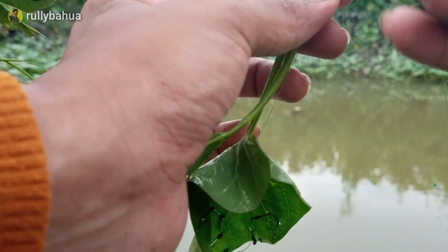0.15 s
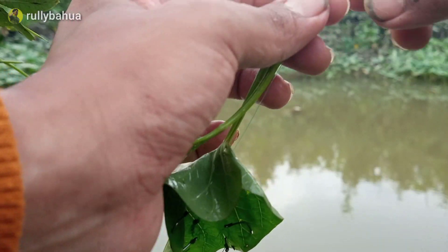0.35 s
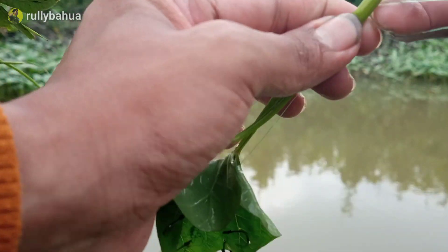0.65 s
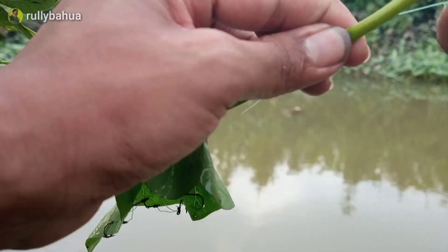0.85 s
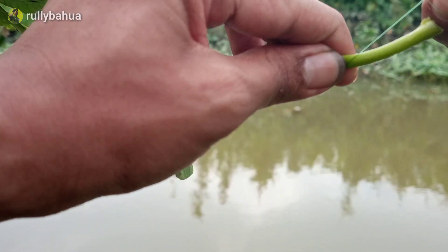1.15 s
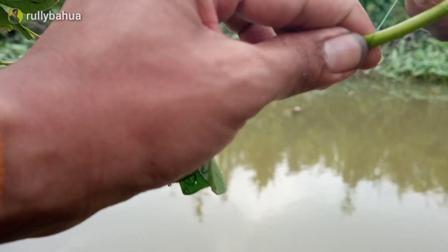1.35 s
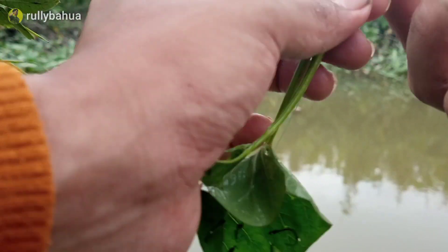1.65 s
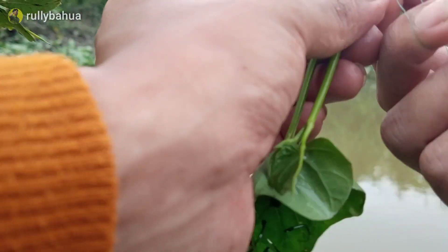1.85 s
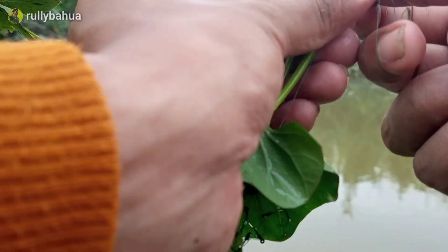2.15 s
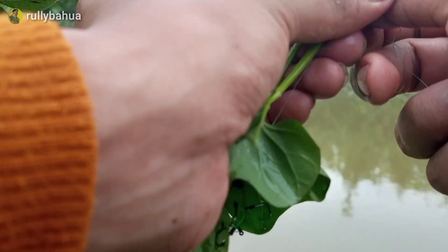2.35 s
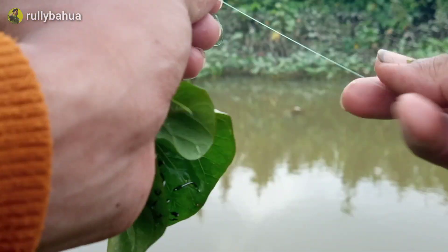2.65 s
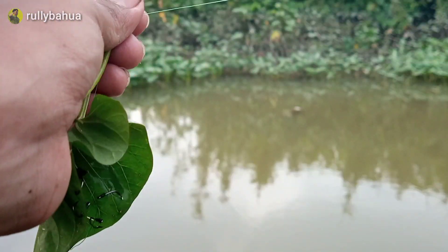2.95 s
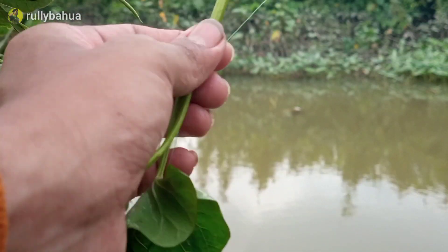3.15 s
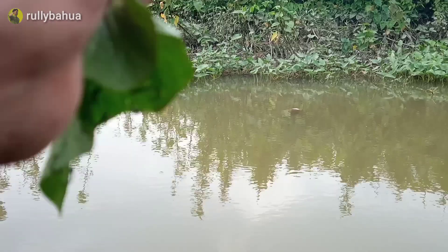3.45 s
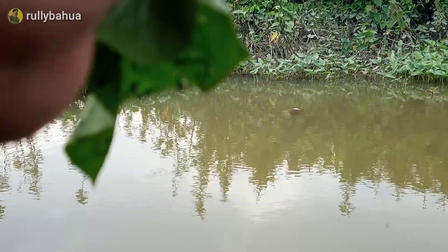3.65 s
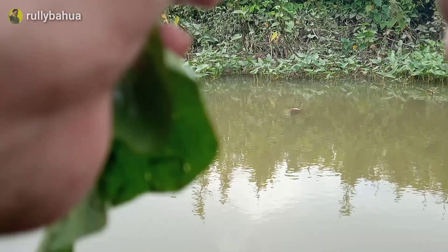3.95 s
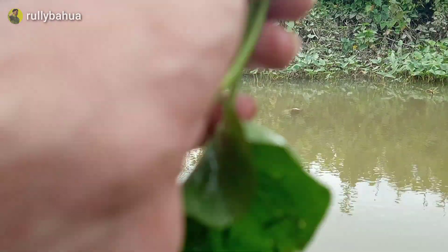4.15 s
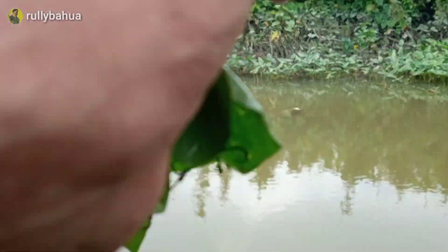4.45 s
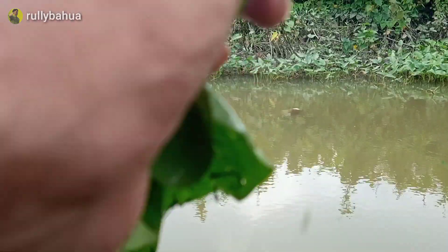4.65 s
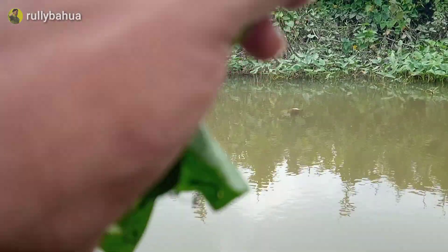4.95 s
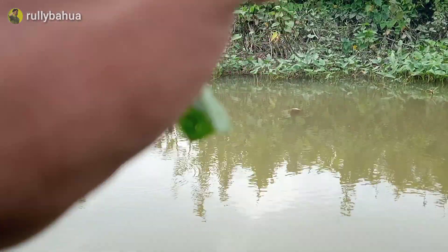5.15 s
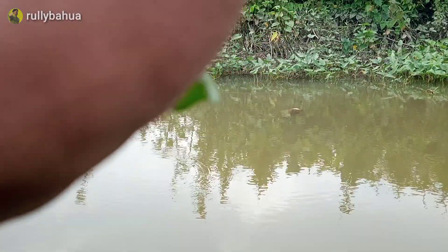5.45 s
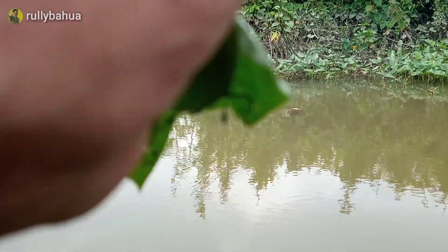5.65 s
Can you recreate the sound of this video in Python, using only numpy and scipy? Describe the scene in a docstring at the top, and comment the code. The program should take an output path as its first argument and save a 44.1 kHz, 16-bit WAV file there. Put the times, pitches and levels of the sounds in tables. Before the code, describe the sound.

Crickets drone by a pond over a distant throbbing engine, with a few bird chirps, light clicks and soft handling bumps.

```python
"""Crickets drone all round a pond, scraping their wings into high trills, buzzes and rasps.
A distant engine throbs and slowly loses speed, its exhaust tones beating over a rumble.
A small bird gives two rising whistles, a run of chips and a twitter; another answers lower,
and faint calls cross the water. Close by, hands work a fishing line and a plant stem:
light clicks, and soft bumps on the microphone."""
import sys
import numpy as np
from scipy import signal
from scipy.fft import rfft, irfft, next_fast_len
from scipy.io import wavfile
from scipy.ndimage import uniform_filter1d

SR = 44100
rng = np.random.default_rng(int(sys.argv[2]) if len(sys.argv) > 2 else 0)


def output_pcm(signal):
    """Save a mono or channel-first signal as 16-bit PCM at the path in sys.argv[1].

    Samples are clipped to [-1, 1] before scaling.
    """
    pcm = np.clip(np.atleast_2d(signal).T, -1, 1) * 32767
    wavfile.write(sys.argv[1], SR, np.round(pcm).astype(np.int16))


N = 255766
T = np.arange(N) / SR


def undb(db):
    """Decibels to gain."""
    return 10 ** (np.asarray(db) / 20)


def unit(x):
    """Scale to rms 1."""
    return x / np.sqrt(np.mean(x ** 2))


def faders(table):
    """One fader ride for each column after the times."""
    times, *columns = np.transpose(table)
    return [np.interp(T, times, column) for column in columns]


def eq_curve(points, size):
    """Gain of (Hz, dB) EQ points on the bins of a transform."""
    hz, db = np.transpose(points)
    bins = np.maximum(np.fft.rfftfreq(size, 1 / SR), 1)
    return undb(np.interp(np.log(bins), np.log(hz), db, left=-90, right=-90))


def noise(eq):
    """Noise through an EQ, rms 1."""
    size = next_fast_len(N)
    return unit(irfft(rfft(rng.standard_normal(size)) * eq_curve(eq, size), size)[:N])


def wander(rate_hz):
    """Smooth random modulation, rms 1."""
    hold = max(int(SR / rate_hz), 1)
    steps = np.repeat(rng.standard_normal(N // hold + 1), hold)
    return unit(uniform_filter1d(steps, hold)[:N])


def soft_gate(middle_s, half_s):
    """A rounded gate that opens and closes about a moment."""
    return np.exp(-((T - middle_s) / half_s) ** 4)


def add(out, start_s, sound):
    """Mix a sound in at a time."""
    i = max(int(start_s * SR), 0)
    out[i:i + len(sound)] += sound[:max(N - i, 0)]


def bank_echo(dry, wet_db, t60, dull_hz=9000):
    """Leaves and the far bank add a short, duller diffuse echo."""
    t = np.arange(SR // 2) / SR
    tail = rng.standard_normal(len(t)) * undb(-60 * t / t60) * (t > .002)
    tail = signal.sosfilt(signal.butter(1, dull_hz, fs=SR, output="sos"), tail / np.linalg.norm(tail))
    return dry + undb(wet_db) * signal.fftconvolve(dry, tail)[:N]


# Tone of the open air. Each row: frequency in Hz, gain in dB.
AIR_EQ = [(25, -3), (100, 4), (400, 1), (500, -0.5), (590, 1.5), (720, -3.5), (1000, -5), (1900, -9),
          (3500, -12.5), (5500, -14), (11000, -13), (13000, -27.5), (15300, -12.5)]
def air():
    """A quiet, wavering bed of hiss."""
    return noise(AIR_EQ) * undb(-60 + 1.2 * wander(12))


# Exhaust partials. Each row: multiple of the cycle rate, opening gain in dB, closing gain in dB.
EXHAUST_PARTIALS = [(4, -9.5, -6), (5, 4, 0), (6, -7.5, 0.5), (7, -49, -31), (8, -42, -11.5),
                    (11, -54, -24.5)]
# Fader for the exhaust note. Each row: time in seconds, relative level in dB.
EXHAUST_FADER = [(0.0, -36.5), (0.15, -33.5), (0.45, -36), (0.6, -32.5), (0.75, -35.0), (1.05, -35),
                 (1.33, -39), (1.55, -34.5), (1.8, -38.5), (2.0, -38), (2.3, -35), (2.5, -36.5),
                 (3.3, -37.3), (3.72, -34), (4.24, -38), (4.7, -35), (5.3, -36), (5.8, -36.1)]
# The low rumble and the higher roar. Each row: frequency in Hz, gain in dB.
RUMBLE_EQ = [(25, -34), (45, -14.5), (65, -14.5), (95, -0.5), (125, -6.5), (170, -2), (215, -5),
             (250, -14.5), (310, -29.5), (450, -34.5)]
ROAR_EQ = [(170, -26.5), (220, 1), (260, 0.5), (320, 0), (360, -10.5), (420, -18.5), (520, -39)]
def engine(cycle_hz=30.86, sag_hz_per_s=.607, first_firing_s=.023, chug=.053):
    """Neighbouring multiples of the cycle rate pass the exhaust and beat into a throb over a rumble."""
    hz = (cycle_hz - sag_hz_per_s * T) * (1 + .0017 * wander(12))
    phase = 2 * np.pi * (np.cumsum(hz) / SR - cycle_hz * first_firing_s)
    # all partials peak together at each firing
    note = sum(undb(first + (last - first) * T / T[-1] + 1.6 * wander(14)) * np.cos(multiple * phase)
               for multiple, first, last in EXHAUST_PARTIALS)
    exhaust = unit(note) * undb(faders(EXHAUST_FADER)[0] + .94)
    rumble = noise(RUMBLE_EQ) * undb(-44)
    roar = noise(ROAR_EQ) * (1 + chug * np.cos(phase))
    roar_db = -62 + 14 * soft_gate(middle_s=4.17, half_s=2.08) + 1.9 * wander(12)
    return exhaust + rumble + roar * undb(roar_db)


def bird_notes(notes, waver=.0094, rasp=.014, flutter_db=2):
    """Whistles, each bent through three pitches; fast pitch jitter roughens the short ones most."""
    out, drift, jitter = np.zeros(N), waver * wander(400), rasp * wander(2000)
    for start, length, first_hz, middle_hz, last_hz, db in notes:
        progress = np.linspace(0, 1, int(length * SR))
        span = int(start * SR) + np.arange(len(progress))
        bend = np.polyfit([0, .5, 1], [first_hz, middle_hz, last_hz], 2)
        hz = np.polyval(bend, progress) * (1 + drift[span] + jitter[span] * min(1, .035 / length))
        envelope = undb(db) * np.sin(np.pi * progress)
        add(out, start, envelope * np.sin(2 * np.pi * np.cumsum(hz) / SR))
    return out * undb(flutter_db * wander(120))


# Distant calls. Each row: start in seconds, length in seconds, pitch in Hz,
# glide as last pitch over first, relative level in dB.
FAR_CALLS = [(1.16, 0.079, 1838, 1.03, -58.5), (1.185, .032, 3400, 0.98, -58.5),
             (1.49, .076, 5450, 1.1, -59), (1.505, .061, 3710, .94, -63), (1.83, 0.051, 2550, 1.14, -59.5),
             (2.88, .07, 2220, 1.01, -60), (2.99, 0.066, 2136, 0.89, -58), (3.17, 0.065, 1370, 1.02, -63.5),
             (5.04, .12, 5400, 1.02, -64)]
def far_birds(stray_db=-72, stray_count=160):
    """Short glides from across the water, among stray notes barely above the air."""
    when, pitch, bend, size = rng.random((stray_count, 4)).T
    strays = np.transpose([when * (T[-1] - .1), .025 + .035 * size, 1300 * 4.4 ** pitch,
                           .9 + .2 * bend, stray_db + 4 * size])  # columns as in FAR_CALLS
    return bird_notes([(start, length, hz / glide ** .5, hz, hz * glide ** .5, db)
                       for start, length, hz, glide, db in np.vstack([FAR_CALLS, strays])])


# Handling thuds. Each row: middle in seconds, relative level in dB, half width in seconds.
BUMP_CUES = [(0.04, -40.5, 0.019), (0.687, -36, 0.038), (0.777, -34.5, 0.023), (1.31, -34.5, 0.02),
             (1.508, -40, .011), (2.435, -28, 0.017), (2.98, -34, 0.012), (3.093, -29.5, 0.01),
             (3.135, -37.5, 0.018), (3.673, -36, 0.011), (4.06, -22, 0.01), (4.143, -33, 0.033),
             (4.351, -24.5, 0.012), (4.465, -31.5, 0.013), (4.537, -28.5, 0.02), (4.994, -37, 0.016),
             (5.07, -26, 0.015)]
def mic_bumps(thud_hz=73, grit=.65, faint_db=-41, faint_s=.014, faint_count=5):
    """Moving hands thud softly on the microphone, with fainter bumps at random."""
    out = np.zeros(N)
    shake = noise([(25, -18), (45, 0), (90, 6), (130, 5), (220, -19)])
    faint = [(when * T[-1], faint_db, faint_s) for when in rng.random(faint_count)]
    for middle, db, half in BUMP_CUES + faint:
        swell = np.exp(-.5 * ((T - middle) / half) ** 2)
        thud = .72 * np.cos(2 * np.pi * thud_hz * (T - middle))
        out += undb(db) * swell * (thud + grit * shake)
    return out


# Clicks and brief rustles. Each row: start in seconds, relative level in dB,
# treble shelf in dB, snap length in seconds.
CLICK_CUES = [(0.8137, -26.5, -30, .0007), (1.744, -58, 9, .004), (2.341, -40, -2, 0.00088),
              (2.6091, -24, -1, .0015), (2.612, -28.5, 2.5, 0.0011), (2.634, -36, -3, .0008),
              (2.643, -31.5, -5, 0.0011), (2.888, -48, -8, 0.00063), (2.968, -42, 8, 0.00082),
              (2.994, -31, 9, 0.001), (3.0404, -40, 9, 0.00094), (3.155, -57, 10, .003),
              (3.632, -61, 1, 0.049), (3.738, -54, 4, .0042), (4.026, -66, 7, .0081),
              (4.102, -60, -1, 0.034), (4.37, -60, 6, .006)]
# Tone of every click. Each row: frequency in Hz, gain in dB.
CLICK_EQ = [(500, -14), (1100, -15), (1650, -3.5), (2400, -0.5), (3500, -8.5), (5000, 2), (6500, -9),
            (9000, -1), (11000, 2), (13000, -11), (15500, 1)]
# The hollow ring. Each row: frequency in Hz, gain in dB, seconds to fall by 60 dB.
CLICK_MODES = [(1540, -13, .022), (1827, 3, 0.009), (2200, -5.5, 0.009), (3040, -3, 0.017),
               (3350, -8, 0.028), (4690, -14, 0.041), (5440, -18, 0.02), (5930, -16, 0.03)]
def line_clicks(ring_db=-8.5, tail_db=-23, tail_s=.017, size=4096):
    """Line and stem give a bright snap, a brief ring and a duller scatter from the cupped hands."""
    out, t = np.zeros(N), np.arange(size) / SR
    shelf = np.clip((np.fft.rfftfreq(size, 1 / SR) - 6000) / 4000, 0, 1)  # fully in above 10 kHz
    ring = sum(undb(db) * np.sin(2 * np.pi * hz * t) * undb(-60 * t / t60)
               for hz, db, t60 in CLICK_MODES)
    for start, db, treble_db, snap_s in CLICK_CUES:
        snap, scatter = rng.standard_normal((2, size))
        attack = rfft(2 * snap * np.exp(-(t / snap_s) ** 2) + undb(ring_db) * ring)
        tail = rfft(scatter * np.exp(-t / tail_s)) * undb(tail_db - 8 * shelf)
        click = irfft((attack + tail) * eq_curve(CLICK_EQ, size) * undb(treble_db * shelf))
        # centred, since the EQ rings on both sides of the attack
        add(out, start - size / 2 / SR, undb(db) * np.roll(click, size // 2))
    return out


def sing(motif, cues):
    """The notes of a motif, repeated at each cue with its own level, pitch and pace."""
    return [(start + delay * stretch, length * stretch,
             first * pitch, middle * pitch, last * pitch, db + note_db)
            for start, db, pitch, stretch in cues
            for delay, length, first, middle, last, note_db in motif]


# Motifs, note by note. Each row: delay in seconds, length in seconds,
# first, middle and last pitch in Hz, gain in dB, all before a cue scales them.
WHISTLE = [(0, .122, 3720, 4660, 5470, 0), (.102, .04, 5190, 5420, 5440, -9)]
CHIP = [(0, 0.0165, 6550, 5880, 5270, 0)]
LEAD_IN = [(0, .025, 4780, 4620, 4330, -9.5), (.072, 0.0416, 5540, 5380, 5170, -0.5)]
TWITTER = [(0, 0.021, 5620, 5395, 5290, 1.5), (.057, 0.018, 4170, 4277, 4160, -2),
           (.071, 0.0174, 5030, 4750, 4620, -1.5)]
ANSWER = [(0, 0.074, 2530, 2670, 3000, -9.5), (.107, 0.08, 2800, 2790, 2830, -4.5),
          (.236, .074, 2410, 2436, 2640, -1), (.302, .079, 2980, 2574, 2550, 0.5)]
# Cues for the motifs. Each row: start in seconds, level in dB, pitch ratio, time stretch.
WHISTLE_CUES = [(1.341, -43.5, 0.98, .85), (2.168, -41.5, 1, 0.96)]
CHIP_CUES = [(2.956, -42.5, 0.9, 1.17), (3.114, -37.5, 1, 0.88), (3.294, -55, 0.93, 1),
             (3.498, -47, 0.98, 1.1), (3.599, -44, 1.05, 1.22), (3.68, -46, 0.91, 1.2),
             (3.748, -43.5, 0.96, .9)]
LEAD_IN_CUES = [(3.812, -37.5, 0.98, 0.96)]
TWITTER_CUES = [(3.966, -43.5, 1, 0.94), (4.077, -47.5, 1, 0.98), (4.199, -44, 0.98, .97),
                (4.32, -47.5, 1.02, 1.09), (4.445, -45.5, 1, 1.02), (4.567, -48, 1, 0.99),
                (4.692, -53, 1, 1.08)]
ANSWER_CUES = [(4.31, -52.5, 1, 0.97)]
def near_birds():
    """Two clear whistles, raspy chips, a lead-in and a rolling twitter; a lower bird answers."""
    clear = bird_notes(sing(WHISTLE, WHISTLE_CUES) + sing(ANSWER, ANSWER_CUES), waver=.0071)
    chips = bird_notes(sing(CHIP, CHIP_CUES), rasp=.041)
    twitter_notes = sing(LEAD_IN, LEAD_IN_CUES) + sing(TWITTER, TWITTER_CUES)
    twitter = bird_notes(twitter_notes, waver=.014, rasp=.016)
    # the bush round the bird smears the short notes
    return clear + bank_echo(chips + twitter, wet_db=-4.5, t60=.09)


def stridulate(eq, stroke_hz, depth, jitter):
    """Each wing stroke scrapes a burst out of the wing's resonance; the foliage fills the gaps."""
    phase = 2 * np.pi * np.cumsum(stroke_hz * (1 + jitter * wander(25.55))) / SR
    return unit(noise(eq) * np.exp(depth * np.cos(phase)))


# Wing resonances of the five voices. Each row: frequency in Hz, gain in dB.
TRILL_EQ = [(6350, -42.5), (6650, -17), (6820, -13), (6915, -3.5), (7020, -11.5), (7300, -14.5),
            (7700, -52)]
LOWER_CHORUS_EQ = [(6900, -16), (7350, -17), (7650, -1.5), (8100, 0), (8450, -4), (8800, -6.5), (9300, -24)]
BUZZ_EQ = [(7900, -9), (8120, -8), (8250, 1), (8380, 7), (8460, 7), (8570, -7), (8800, -58)]
UPPER_CHORUS_EQ = [(8400, -30), (8900, 2.5), (9300, 6.5), (9550, 2), (9900, -6), (10600, -10.5),
                   (10950, -15.5), (11300, -32)]
RASP_EQ = [(10100, -18), (10500, -4), (10900, 6), (11080, 1), (11250, -17), (11650, -22), (12100, -34)]
# Slow chorus swells. Each row: time in seconds, relative level in dB of the lower, then the upper.
CHORUS_FADERS = [(0.0, -47, -51.5), (0.53, -48, -49.5), (0.9, -47.5, -49), (1.29, -46, -48.5),
                 (1.73, -46.5, -49), (2.68, -48.5, -47.5), (3.15, -46, -49.5), (3.63, -47.5, -49.5),
                 (4.36, -48.5, -53), (5.39, -45.5, -51), (5.57, -47, -51.5), (5.8, -48.5, -52)]
# Brief dips in the trill. Each row: middle in seconds, half length in seconds, dip in dB.
TRILL_DIPS = [(.56, 0.14, -2), (1.25, .04, -2.5), (1.43, 0.036, -6), (1.994, 0.032, -4), (2.254, 0.057, -4),
              (3.41, 0.094, -6), (4.224, 0.047, -9), (4.683, .035, -4), (5.15, 0.031, -12),
              (5.578, .04, -0.5)]
# Bouts of buzzing. Each row: middle in seconds, half length in seconds, level in dB.
BUZZ_BOUTS = [(0, 0.073, -47), (1.604, 0.49, -51.5), (2.98, .17, -52.5), (3.58, .14, -47),
              (5.32, 0.25, -45)]
# Phrases of the rasp. Each entry: level in dB.
RASP_LEVELS = [-67, -63, -60.5, -57, -57, -59, -58]
def crickets(rasp_every_s=.815, flutter_hz=8.1):
    """Wings scrape a pulsing trill, two blurred choruses, a near buzz in bouts and a thin high rasp."""
    trill = stridulate(TRILL_EQ, stroke_hz=59.5, depth=.5, jitter=.012)
    dips_db = sum(db * soft_gate(middle, half) for middle, half, db in TRILL_DIPS)
    trill *= undb(-53 + dips_db + .2 * wander(5.15))

    lower_db, upper_db = faders(CHORUS_FADERS)
    flutter_db = 1.23 * np.sin(2 * np.pi * flutter_hz * T)
    lower = stridulate(LOWER_CHORUS_EQ, stroke_hz=110, depth=.033, jitter=.021)
    upper = stridulate(UPPER_CHORUS_EQ, stroke_hz=125, depth=.15, jitter=.022)
    choruses = lower * undb(lower_db + 2.6) + upper * undb(upper_db + 1.5 + flutter_db)

    buzz = stridulate(BUZZ_EQ, stroke_hz=213, depth=.58, jitter=.0047)
    buzz *= undb(-56) + sum(undb(db) * soft_gate(middle, half) for middle, half, db in BUZZ_BOUTS)

    rasp = stridulate(RASP_EQ, stroke_hz=99, depth=.43, jitter=.018)
    rasp *= sum(undb(db) * soft_gate(.31 + k * rasp_every_s, half_s=.15)
                for k, db in enumerate(RASP_LEVELS))
    return trill + choruses + buzz + rasp


def scene():
    """The mono mix, heard from the water's edge."""
    bed = air()
    near = bank_echo(near_birds(), wet_db=-8, t60=.3)
    far = bank_echo(far_birds(), wet_db=0, t60=.3) * undb(-3)
    hands = bank_echo(line_clicks(), wet_db=-7.5, t60=.14) + mic_bumps()
    return (bed + engine() + far + hands + near + crickets())[None]


def record(dry, top_hz=15750):
    """The microphone chain cuts the top end steeply."""
    return signal.sosfilt(signal.ellip(10, .2, 70, top_hz, fs=SR, output="sos"), dry)


dry = scene()
out = record(dry)
output_pcm(out)
```